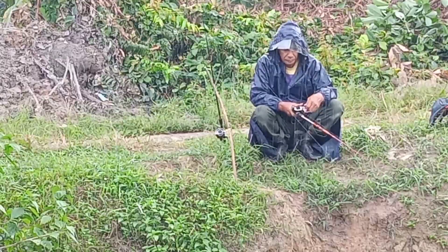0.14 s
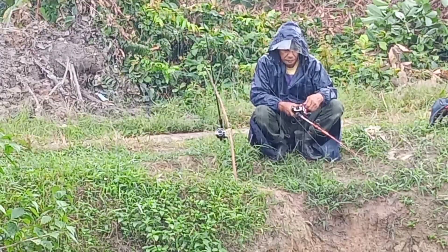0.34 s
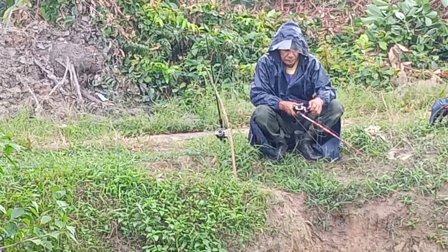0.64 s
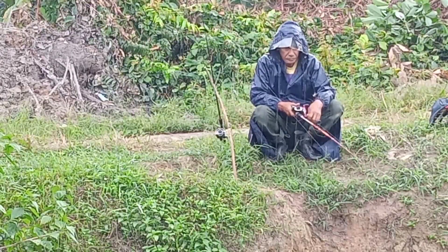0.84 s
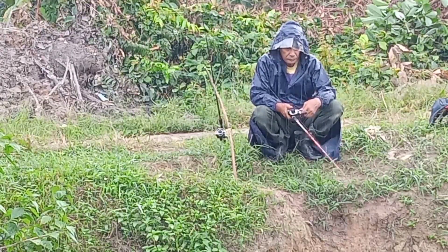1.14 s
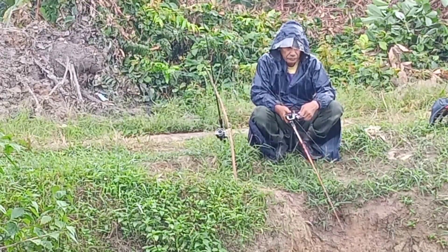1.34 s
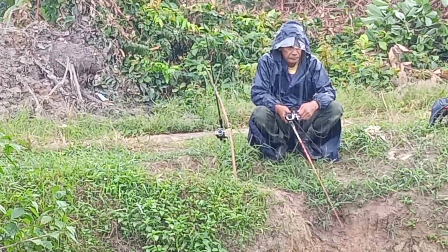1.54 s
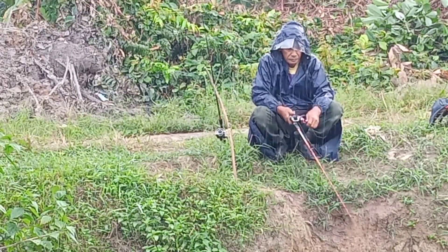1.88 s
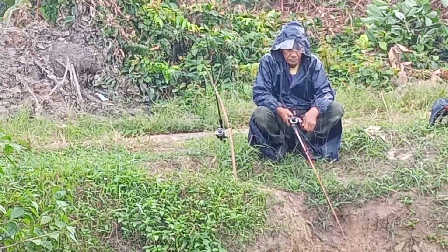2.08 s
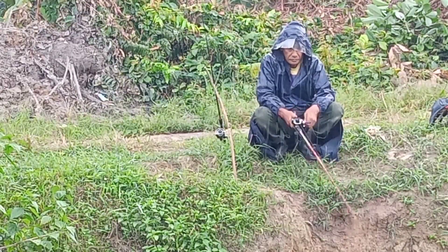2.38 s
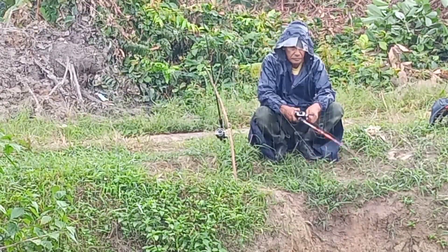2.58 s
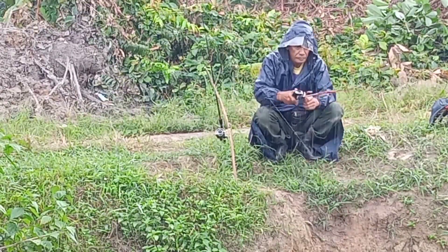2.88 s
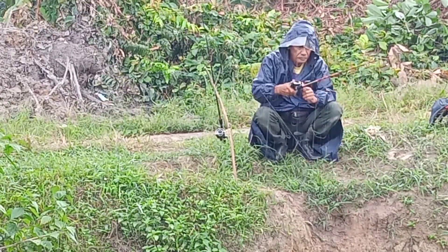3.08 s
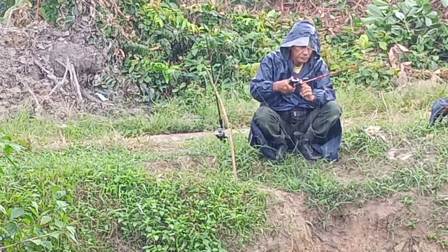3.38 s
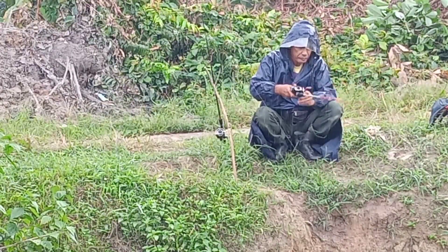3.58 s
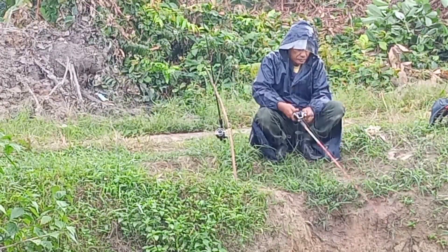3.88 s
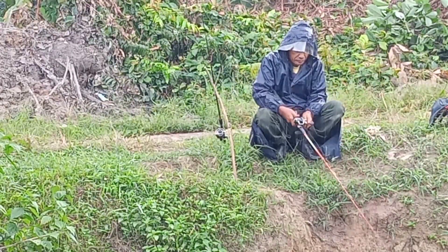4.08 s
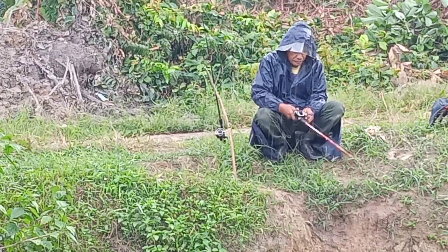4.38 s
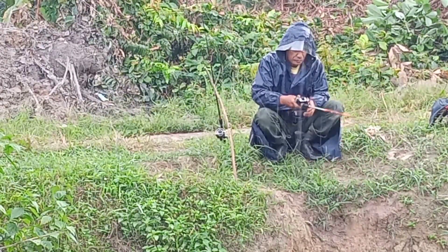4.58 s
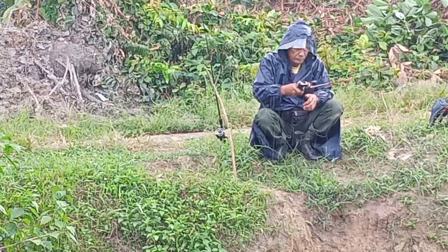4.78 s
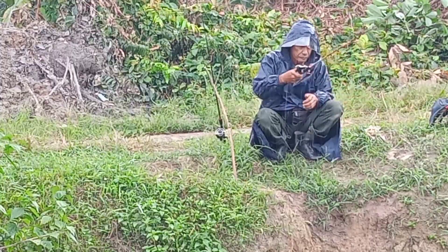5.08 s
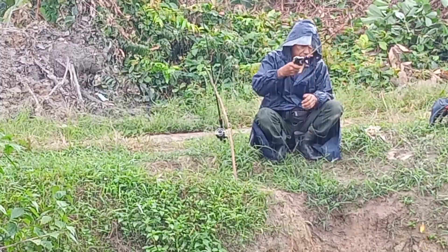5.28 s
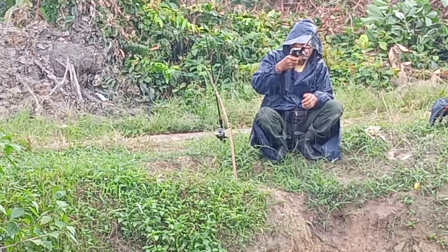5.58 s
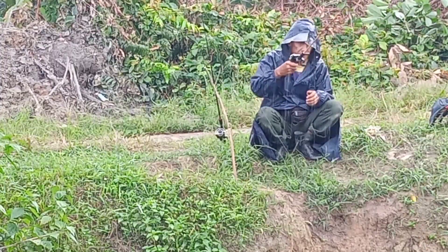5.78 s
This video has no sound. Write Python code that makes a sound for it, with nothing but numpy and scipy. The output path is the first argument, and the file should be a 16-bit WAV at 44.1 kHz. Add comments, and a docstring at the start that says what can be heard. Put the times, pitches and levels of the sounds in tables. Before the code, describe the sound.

An even wash of heavy rain covers a grassy bank, with a dense patter on leaves, a little fine spray and very faint plinks on open water. Three large drips hit the sheltered microphone's cover as short, dull taps without any ring: the first is soft, the second stronger and the third by far the loudest. The rain holds the same level throughout.

```python
"""Steady heavy rain on grass, leaves and water, heard from a shelter on a bank.
Countless far drops merge into a wash, nearer ones burst into a patter, and fine spray ticks close by.
Now and then a fat drip lands on the microphone's housing or cover with a dull, ringless tap.
Tucked underneath, bubbles trapped by drops on open water ring as faint plinks."""
import sys
import numpy as np
from scipy import signal
from scipy.io import wavfile
from scipy.ndimage import uniform_filter1d

SR = 44100
rng = np.random.default_rng(int(sys.argv[2]) if len(sys.argv) > 2 else 0)


def wav_record(signal):
    """Record a signal, one row per channel, as 16-bit PCM in the file named by sys.argv[1]."""
    frames = np.transpose(np.atleast_2d(signal))
    bounded = np.clip(frames, -1, 1)
    # unit amplitude maps onto the largest positive 16-bit level
    quanta = np.round(bounded * 32767).astype(np.int16)
    wavfile.write(sys.argv[1], SR, quanta)


N = 261954

# EQ curve of the far rain: f/Hz, relative level/dB
WASH_EQ = [(27, -44), (45, -9.5), (90, -5), (220, -8.5), (420, -4), (800, -2), (1600, -0.85), (2300, -1),
           (3500, -6), (5100, -17), (6400, -23), (8200, -21), (11500, -34.5), (15500, -22)]
# EQ curve of nearer drops on leaves and water: f/Hz, relative level/dB
PATTER_EQ = [(150, -26.5), (600, -5.5), (1500, 1), (2500, -0.5), (3600, -2), (5200, -15.5), (6400, -21),
             (8200, -16), (11500, -29), (15500, -16)]
# EQ curve of the fine spray: f/Hz, relative level/dB
SPRAY_EQ = [(1000, -10), (4000, -10), (8000, 3), (11500, 4), (15000, 4)]
# cues for the fat drips: t/s, level/dB of the push before its bass is cut
DRIP_CUES = [(0.097, -15.5), (2.5120, -9.5), (4.0445, 6)]
# cues for the clearest close droplets: t/s, peak level/dB, f/Hz
TICK_CUES = [(0.4704, -36, 2960), (0.4805, -40, 8100), (4.560, -43, 14300), (4.5635, -40.5, 7860),
             (5.032, -45, 13000), (5.7555, -36, 14600)]
# resonances of the microphone's port, added to the dry sound: f/Hz, width/Hz, level/dB
PORT_RESONANCES = [(7150, 370, -9.5), (8190, 560, 5), (9100, 220, -5), (11350, 500, -4.5),
                   (13550, 370, -19), (15900, 400, -20)]


def rain_wash(level_db=-43, patchy_db=1.45, swell_db=-0.02, size=2048):
    """The bed: countless far drops blur into noise, with patches drifting through its spectrum."""
    hz, hop = np.fft.rfftfreq(size, 1 / SR), size // 4
    frames = N // hop + 5
    real, imag, patches = rng.standard_normal((3, frames, len(hz)))
    patches = uniform_filter1d(patches, size=4, axis=0)  # smooth in time
    patches = unit_rms(uniform_filter1d(patches, size=25, axis=1))  # and in frequency
    swell = unit_rms(uniform_filter1d(rng.standard_normal(frames), size=10))[:, None]
    spectrum_db = curve_at(WASH_EQ, hz) + patchy_db * patches + swell_db * swell
    spectra = (real + 1j * imag) * gain_of(spectrum_db)
    noise = signal.istft(spectra.T, nperseg=size, noverlap=size - hop)[1][:N]
    return gain_of(level_db) * unit_rms(noise)


def rain_patter(level_db=-47.5):
    """The midground: nearer drops burst on leaves and water."""
    drops = shower(per_s=600, spread_db=2.0, cap=3.5, splash_s=0.0034, tail_db=-9.5, tail_s=0.013)
    return gain_of(level_db) * unit_rms(equalise(drops, PATTER_EQ))


def fat_drips(contact_ms=2.354, halving_db=29.5, leak=1.28, rebound=0.27):
    """Dull taps: each drip is one smooth push that leaks away and swings back."""
    t, out = np.arange(SR // 20) / SR, np.zeros(N)
    soft_drips = scattered(per_s=0.89, db=-35, spread_db=1)
    for start_s, db in DRIP_CUES + soft_drips:
        # contact_ms holds at 0 dB; a harder hit is shorter and thinner in the bass
        contact_hz = 1000 / contact_ms * 2 ** (db / halving_db)
        push = -np.sin(np.pi * np.minimum(t * contact_hz, 1)) ** 2
        leaked = signal.lfilter(*signal.butter(1, leak * contact_hz, "high", fs=SR), push)
        tap = signal.lfilter(*signal.butter(2, rebound * contact_hz, "high", fs=SR), leaked)
        add(out, start_s, gain_of(db) * tap)
    return out


def droplet_ticks(splash_s=0.0011, width_hz=3200):
    """Close-up detail: single droplets, each a quick splash focused around one pitch."""
    t, out = np.arange(SR // 40) / SR, np.zeros(N)
    faint_ticks = [(start_s, db, rng.uniform(12500, 15000))
                   for start_s, db in scattered(per_s=1.2, db=-47, spread_db=2)]
    for start_s, db, hz in TICK_CUES + faint_ticks:
        splash = rng.choice([-1, 1], len(t)) * np.exp(-t / splash_s)
        tick = resonate(resonate(splash, hz, width_hz), hz, width_hz)
        add(out, start_s, gain_of(db) * tick / abs(tick).max())
    return out


def bubble_plinks(level_db=-58, centre_hz=2900, octaves=0.9, cycles=16, rise=0.006, count=900):
    """Drops on open water trap bubbles, which ring briefly and bend up in pitch."""
    t, out = np.arange(SR // 20) / SR, np.zeros(N)
    for when, pitch, faintness in rng.random((count, 3)):
        hz = centre_hz * 2 ** (octaves * (2 * pitch - 1))
        age = t * hz / cycles  # in decay times
        ring = np.sin(2 * np.pi * hz * t * (1 + rise * age)) * np.exp(-age)
        accent_db = -1.5 * np.log(faintness + 0.03)  # a few stand out
        add(out, when * N / SR, gain_of(accent_db) * ring)
    return gain_of(level_db) * unit_rms(equalise(out, PATTER_EQ))


def fine_spray(level_db=-68.5):
    """A faint sparkle on top: tiny, bright droplets landing close by."""
    drops = shower(per_s=130, spread_db=5.0, cap=2.0, splash_s=0.0025, tail_db=-12, tail_s=0.02)
    return gain_of(level_db) * unit_rms(equalise(drops, SPRAY_EQ))


def shower(per_s, spread_db, cap, splash_s, tail_db, tail_s, variants=40):
    """Drops of random size at random times: a short burst, then a tail of splashed water."""
    t, out = np.arange(SR // 12) / SR, np.zeros(N)
    accent_db = spread_db * np.minimum(rng.exponential(1, N), cap)
    hits = gain_of(accent_db) * (rng.random(N) < per_s / SR)
    variant = rng.integers(0, variants, N)
    tail = gain_of(tail_db) * np.exp(-t / tail_s)
    for k in range(variants):
        burst = np.exp(-t / (splash_s * 2 ** rng.uniform(-0.59, 1)))
        splash = rng.standard_normal(len(t)) * (burst + tail)
        out += signal.oaconvolve(hits * (variant == k), unit_rms(splash))[:N]
    return out


def scattered(per_s, db, spread_db):
    """Cues (t/s, level/dB) at random times, with levels scattered around db."""
    draws = rng.random((round(per_s * N / SR), 2))
    return [(when * N / SR, db + spread_db * (2 * size - 1)) for when, size in draws]


def equalise(x, curve, size=2048):
    """Minimum-phase EQ: clicks keep their sharp attack."""
    hz = abs(np.fft.fftfreq(size, 1 / SR))
    log_gain = np.log(gain_of(curve_at(curve, hz)))
    response = np.fft.ifft(np.exp(np.conj(signal.hilbert(log_gain)))).real
    return signal.oaconvolve(x, response[:size // 2])[:N]


def curve_at(curve, hz):
    """Level of an EQ curve at hz, along a log-frequency axis."""
    curve_hz, db = np.transpose(curve)
    return np.interp(np.log(hz + 1), np.log(curve_hz + 1), db)


def resonate(x, hz, width_hz):
    """One resonant band with unity gain at its centre."""
    return signal.lfilter(*signal.iirpeak(hz, hz / width_hz, SR), x)


def gain_of(db):
    """Decibels to a factor."""
    return 10 ** (np.asarray(db) / 20)


def unit_rms(x):
    """Normalises to an rms of 1."""
    return x / np.sqrt(np.mean(x ** 2) + 1e-20)


def add(mix, start_s, sound):
    """Lays a sound into the mix at its cue."""
    part = mix[max(round(start_s * SR), 0):][:len(sound)]
    part += sound[:len(part)]


def scene():
    """The rain layers from far to near, mixed in mono."""
    rain = rain_wash() + rain_patter() + bubble_plinks()
    return (rain + fine_spray() + droplet_ticks() + fat_drips())[None]


def record(dry, low_cut_hz=30, high_cut_hz=15500):
    """The microphone's port rings in the treble; the deepest bass and the very top are cut."""
    ringing = sum(gain_of(db) * resonate(dry, hz, width) for hz, width, db in PORT_RESONANCES)
    trimmed = signal.lfilter(*signal.butter(2, low_cut_hz, "high", fs=SR), dry + ringing)
    high_cut = signal.firwin(511, high_cut_hz, window=("kaiser", 9), fs=SR)
    return signal.oaconvolve(trimmed, high_cut[None], "same")


dry = scene()
out = record(dry)
wav_record(out)
```